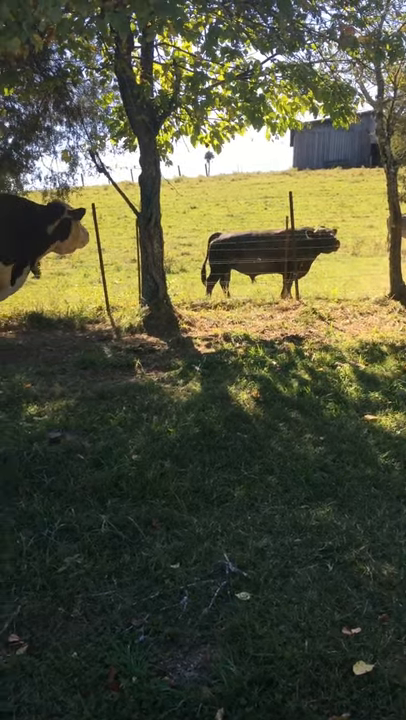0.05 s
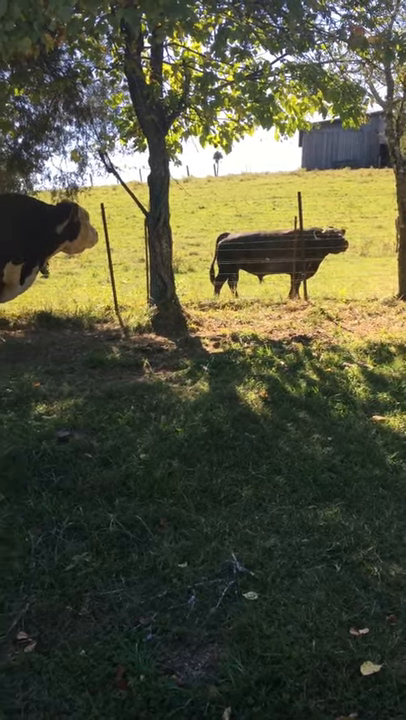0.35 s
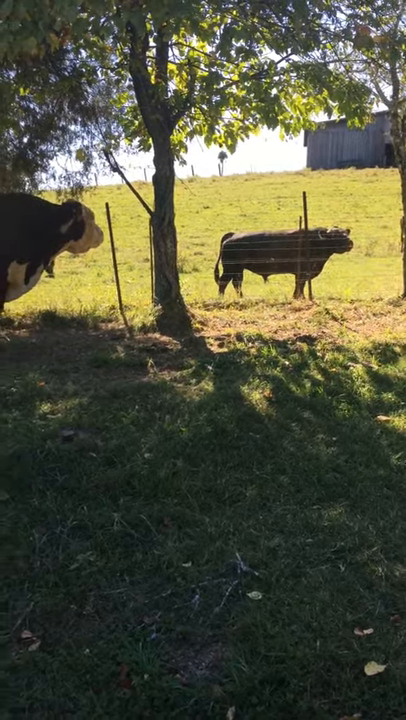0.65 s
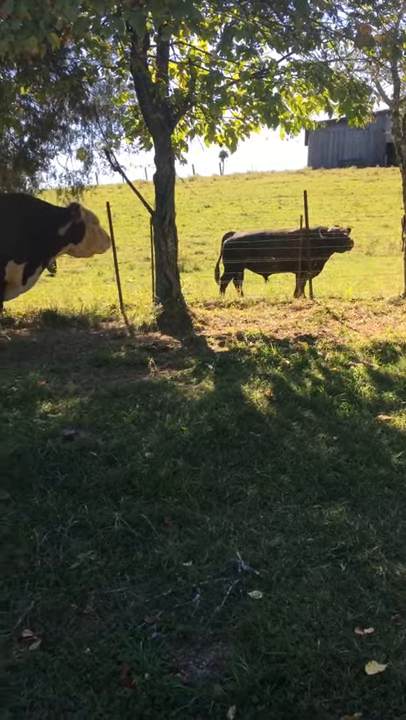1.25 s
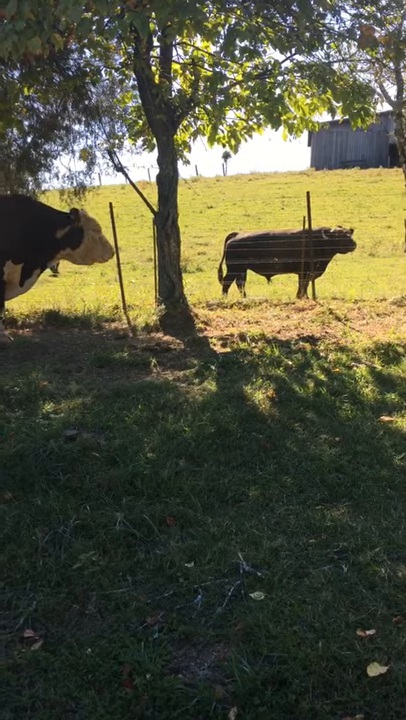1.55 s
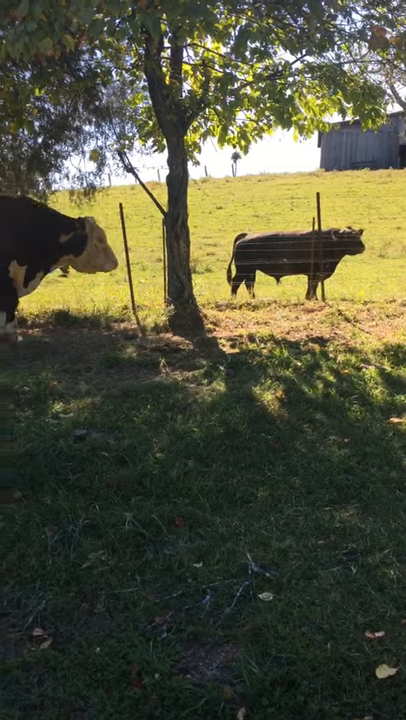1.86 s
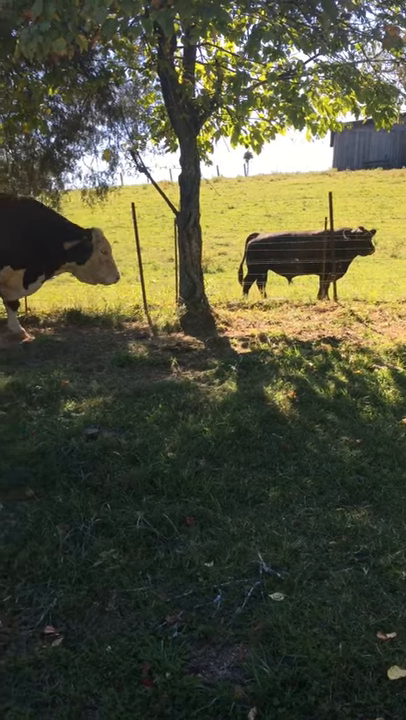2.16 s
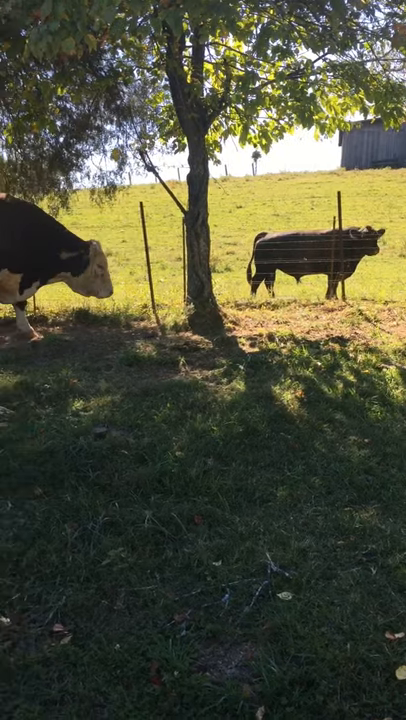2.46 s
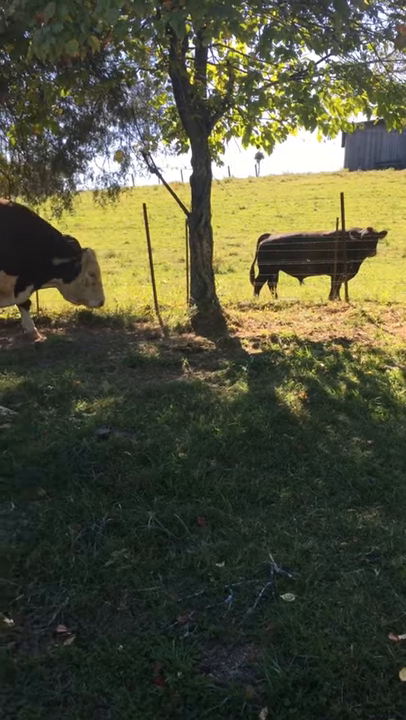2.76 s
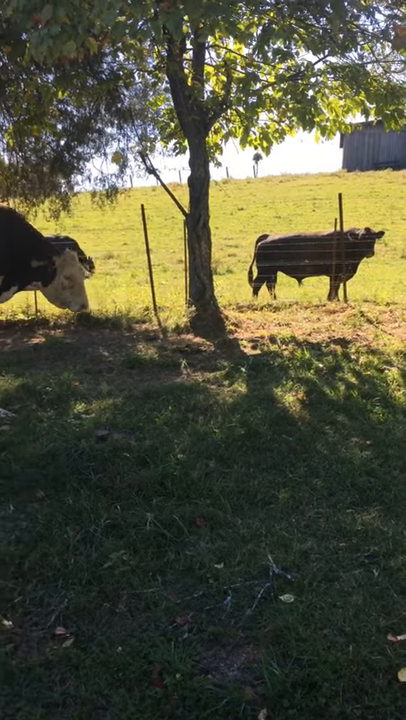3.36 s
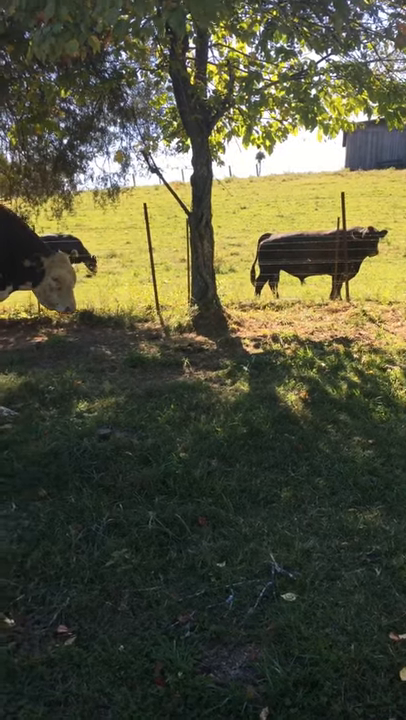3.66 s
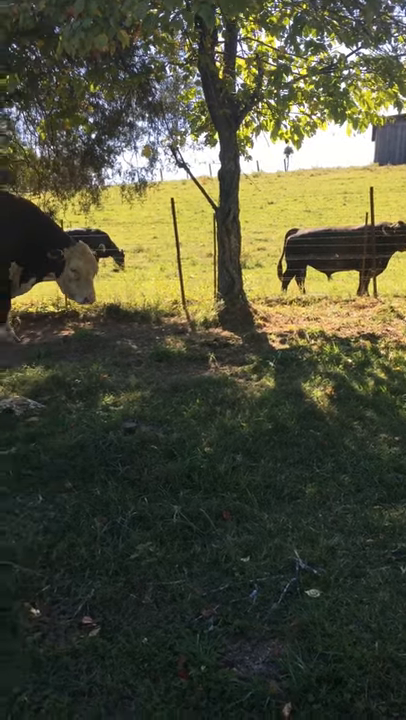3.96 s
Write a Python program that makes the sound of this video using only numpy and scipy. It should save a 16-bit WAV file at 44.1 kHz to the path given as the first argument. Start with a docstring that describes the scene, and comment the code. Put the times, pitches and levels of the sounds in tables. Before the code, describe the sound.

One low bull bellow in a quiet pasture, with soft metal clanks and faint crickets.

```python
"""A bull bellows across a quiet pasture

The bull holds one low, nearly closed-mouth bellow that sags and ends in a puff. A weaker, slightly
higher tone beats against it at first. Crickets trill with their wings, something of steel (probably
the wire fence) clanks five times, and soft bumps and rustles sound close to the microphone."""
import sys
import numpy as np
from scipy import signal
from scipy.fft import rfft, irfft, next_fast_len
from scipy.io import wavfile
from scipy.ndimage import map_coordinates

SR = 44100
rng = np.random.default_rng(int(sys.argv[2]) if len(sys.argv) > 2 else 0)


def dump(signal):
    """Clip the signal to [-1, 1] and save it as 16-bit WAV at the path in sys.argv[1]."""
    limited = np.clip(np.atleast_2d(signal).T, -1, 1)
    pcm = np.round(limited * 32767).astype(np.int16)
    wavfile.write(sys.argv[1], SR, pcm)


N = 176400
T = np.arange(N) / SR

# the wash of open air: frequency_hz, level_db
AIR_COLOUR = [(25, -14.5), (120, 2.5), (240, -8.5), (430, -14), (1000, -15.5), (2000, -18.5), (2700, -19.5),
              (4900, -22.5), (6700, -18), (8100, -23), (9500, -21.5), (10600, -31), (15500, -26)]
# how loud that wash is: time_s, level_db
AIR_LEVEL = [(0, -67), (1.4, -68), (2.0, -67), (2.5, -62.5), (2.8, -65.5), (3.3, -65), (4, -65)]
# air stirring at the microphone: frequency_hz, level_db
RUMBLE_COLOUR = [(20, -22), (55, 0), (130, -2), (190, -6), (260, -19), (600, -43)]
# soft bumps: time_s, peak_db, pitch_hz, half_length_s
BUMPS = [(1.547, -53.5, 60.5, 0.016), (2.562, -48.5, 170, 0.016), (3.022, -42.5, 51, 0.015),
         (3.082, -44, 59, 0.011), (3.128, -51.5, 150, 0.0071), (3.182, -44.5, 53, 0.016),
         (3.3, -47.5, 68, 0.019), (3.355, -46.5, 54.5, .014), (3.367, -47, 320, 0.0038),
         (3.378, -36.5, 156.6, 0.0092), (3.388, -45, 70.4, 0.025), (3.488, -49, 63, 0.01),
         (3.562, -53, 68, 0.036), (3.626, -48, 58, 0.017), (3.81, -49.5, 52, 0.029),
         (3.892, -54, 55, 0.023)]
# rustles in the grass: time_s, level_db, half_length_s
RUSTLES = [(2.447, -59, 0.01), (2.624, -60, 0.0046), (2.633, -61.5, 0.029), (3.631, -66, 0.006)]
# the hiss of a rustle: frequency_hz, level_db
GRASS_COLOUR = [(200, -30), (1000, 4), (2000, -4), (3800, -1), (6000, -2.5), (10000, -11.5), (15000, -17)]
# dull scuffs: time_s, level_db, half_length_s
SCUFFS = [(2.63, -57, 0.025), (2.659, -45, 0.0056), (3.374, -55.5, 0.01), (3.79, -80.5, 0.025)]
# the noise of a scuff: frequency_hz, level_db
SCUFF_COLOUR = [(60, -4.5), (200, 2.5), (400, -21), (650, 6), (800, -10), (1000, 4.5), (1250, -27),
                (1550, -4.5), (2100, -47), (8000, -42)]
# cricket trills: start_s, end_s, level_db, pitch_hz, bend_per_stroke_hz
TRILLS = [(-.05, 0.451, -64, 7280, -450), (0.304, 0.471, -56.5, 7365, -1200),
          (0.713, 0.807, -66, 7340, -450), (1.09, 1.397, -64, 7190, -450), (1.255, 1.504, -58, 7350, -1200),
          (1.6, 1.855, -59.5, 7350, -400), (1.619, 2.114, -56.5, 7326, -1200),
          (1.768, 2.143, -63.5, 7680, -350), (2.291, 2.572, -61, 7170, -350),
          (2.375, 2.675, -55, 7304, -900), (2.821, 3.024, -60.5, 7640, -350),
          (3.096, 3.32, -62, 7270, -350), (3.27, 3.33, -58, 7460, 1402), (3.533, 3.667, -60, 7420, 1494.5),
          (3.595, 3.997, -66.5, 7200, -350), (3.747, 3.91, -61, 7330, -350),
          (3.936, 4.02, -57.5, 7270, 1396)]
# steel clanks: time_s, level_db, relative_scrape_db
CLANKS = [(.641, -45.5, -18), (1.523, -50.5, -15), (2.161, -45.5, -28), (3.106, -49, -6),
          (3.248, -48.5, -7)]
# the notes the steel rings with: pitch_hz, level_db, fade_s
STEEL_NOTES = [(845, -20, .5), (905, -18, .3), (980, -11, .26), (1098, -15, .85), (1177, -15, .3),
               (1680, -18, .5), (2089, -11, .31), (2359, -13, .44), (2540, -11, .3), (2563, -11, .3),
               (2702, -11, .32), (2808, -15, .28), (2880, -18, .34), (3052, -15, .27), (3344, -11, .26),
               (3456, -17, .33), (3655, -15, .39), (3818, -15, .25), (3889, -14, .3), (4310, -16, .18),
               (6638, -15, .18), (9100, -19, .14)]
# the rattle in a clank: frequency_hz, level_db
RATTLE_COLOUR = [(300, -33.5), (750, -16.5), (980, -0.5), (1400, -8), (2100, -1), (2650, 1.5), (3050, -5),
                 (3850, 0), (4100, -11.5), (4350, -2.5), (4900, -11.5), (6600, -12), (7500, -18.5),
                 (15000, -26)]
# the crack of a clank: frequency_hz, level_db
CRACK_COLOUR = [(500, -31.5), (2500, -1), (4300, -2.5), (7000, -3), (10000, -3), (11000, -10), (13000, -8),
                (16000, -9)]
# the weaker tone: time_s, pitch_hz, level_db
SECOND_TONE = [(0, 103.2, -44.5), (.25, 103.4, -40.5), (.5, 100.8, -41.5), (.72, 98.3, -40),
               (.82, 98.1, -49), (.95, 96, -63.5), (1.05, 96, -120)]
# its harmonics (whole multiples of its pitch): multiple, level_db
SECOND_HARMONICS = [(1, -8), (2, 0), (3, -20), (4, -13), (5, -35.5), (7, -29)]
# the tune of the bellow: time_s, pitch_hz
BELLOW_PITCH = [(0, 83.35), (.08, 84.72), (.17, 83.56), (.26, 85.9), (.34, 86.12), (.41, 85.6), (.48, 86.8),
                (.53, 86.1), (.61, 87.38), (.71, 87.06), (.765, 83.6), (.835, 87.4), (.97, 85.7),
                (1.04, 84.5), (1.15, 85.5), (1.27, 81.12), (1.32, 75.4), (1.42, 64.8)]
# how hard the bull pushes: time_s, second_harmonic_db, other_harmonics_db
BELLOW_EFFORT = [(0, -25.5, -26), (.3, -24.5, -26), (.62, -25, -25.5), (.9, -24.5, -27.5),
                 (1.262, -25, -29.5), (1.288, -29.5, -29), (1.318, -51.5, -33.5), (1.342, -41.5, -36),
                 (1.38, -51.5, -38.5), (1.43, -81, -60), (1.5, -100, -100)]
# how throat and mouth shape the harmonics: frequency_hz, early_db, late_db
MOUTH_COLOUR = [(87, -18, -15.5), (267, -26.5, -26), (354, -43, -27.5), (410, -36, -33),
                (527, -48.5, -66.5), (600, -48, -56.5), (697, -33, -37.5), (735, -49.5, -37.5),
                (880, -51, -46.5), (954, -28.5, -25), (1010, -33.5, -27), (1120, -45, -45),
                (1243, -38.5, -48), (1295, -60, -60), (1420, -76, -77), (1550, -49.5, -56),
                (1900, -61.5, -62), (1940, -50, -66.5), (2120, -66, -70.5)]
# hoarse air in the throat: frequency_hz, level_db
RASP_COLOUR = [(60, -12), (170, -2), (300, -11), (520, -22), (720, -6), (830, -14), (990, 1), (1220, -9),
               (1400, -25), (1620, -16), (1930, -16), (2300, -31), (2700, -38), (3200, -28), (4000, -48),
               (9000, -70)]
# the last puff of breath: frequency_hz, level_db
PUFF_COLOUR = [(60, -29.5), (170, 12), (350, -14), (600, -3.5), (880, 6.5), (1100, -8), (1500, -18),
               (4000, -42.5)]


def amp(db):
    """Turn decibels into a number to multiply by."""
    return 10 ** (np.asarray(db) / 20)


def unit(x):
    """Scale a sound to an average strength (rms) of 1."""
    return x / np.sqrt(np.mean(x ** 2) + 1e-20)


def curves(rows):
    """Draw a line through time for each table column after the first."""
    times, *columns = np.transpose(rows)
    return [np.interp(T, times, column) for column in columns]


def wobble(per_s):
    """A smooth curve through per_s random values a second."""
    return map_coordinates(rng.standard_normal(2048), [T * per_s + 2], mode="wrap")


def filtered(x, gain_at):
    """Turn each frequency up or down by gain_at(hz)."""
    size = next_fast_len(N + 8192)
    return irfft(rfft(x, size) * gain_at(np.fft.rfftfreq(size, 1 / SR)), size)[:N]


def noise(colour):
    """Noise of strength 1; the colour table sets its balance of low and high."""
    points_hz, db = np.transpose(colour)
    white = rng.standard_normal(N)
    return unit(filtered(white, lambda hz: amp(np.interp(np.log(hz + 1), np.log(points_hz), db))))


def turning(hz):
    """The phase of a vibration: the angle it has turned through so far."""
    return 2 * np.pi * np.cumsum(hz) / SR


def tone(phase):
    """A pure tone of strength 1 that starts anywhere in its cycle."""
    return np.sqrt(2) * np.sin(phase + rng.uniform(0, 2 * np.pi))


def swell(time_s, half_length_s):
    """A bell-shaped rise and fall around time_s."""
    return np.exp(-np.minimum(((T - time_s) / half_length_s) ** 2, 60))


def struck(t, fade_s, rise_s=0.0026):
    """A quick rise, then a fade that loses 60 dB every fade_s."""
    t = np.maximum(t, 0)
    return (1 - np.exp(-t / rise_s)) * np.exp(-np.minimum(np.log(1000) * t / fade_s, 40))


def air():
    """The quiet wash of the open pasture over an uneven low rumble."""
    db, = curves(AIR_LEVEL)
    wash = amp(db + 1.2 * wobble(8)) * noise(AIR_COLOUR)
    rumble = amp(-71 + 2 * wobble(9)) * noise(RUMBLE_COLOUR)
    return wash + rumble


def field_echo(x, level_db=-18.5, delay_s=.02):
    """Trees and a shed send back a faint, blurred echo."""
    tail = rng.standard_normal(SR) * struck(T[:SR] - delay_s, fade_s=.5)
    return amp(level_db) * signal.fftconvolve(x, tail / np.linalg.norm(tail))[:N]


def bumps_and_rustles():
    """Close by: low bumps of a few cycles, rustling grass and dull scuffs."""
    bumps = sum(amp(db) * swell(s, half_s) * np.cos(2 * np.pi * hz * (T - s))
                for s, db, hz, half_s in BUMPS)
    grass = unit(noise(GRASS_COLOUR) * amp(2.4 * wobble(360)))
    rustles = grass * sum(amp(db) * swell(s, half_s) for s, db, half_s in RUSTLES)
    scuffs = noise(SCUFF_COLOUR) * sum(amp(db) * swell(s, half_s) for s, db, half_s in SCUFFS)
    return bumps + rustles + scuffs


def crickets(strokes_per_s=68, sounding_share=.92, rise_s=.04, fall_s=.019):
    """Each wing stroke is a short whistle that bends away from its starting pitch."""
    out = np.zeros(N)
    for start, end, db, hz, bend_hz in TRILLS:
        on = (T > start) & (T < end)
        t = T[on]
        strokes = (t - start) * strokes_per_s + .05 * wobble(12)[on]
        progress = np.minimum(strokes % 1 / sounding_share, 1)  # 0 to 1, then a short rest
        phase = turning(hz + bend_hz * progress ** 4 + 50 * wobble(300)[on])
        fade = np.minimum((t - start) / rise_s, 1) * np.minimum((end - t) / fall_s, 1)
        level = amp(db + 1.6 * wobble(40)[on]) * fade
        pulse = np.abs(np.sin(np.pi * progress ** .94))
        whistle = tone(phase) + amp(-21) * tone(2 * phase)
        out[on] += level * pulse * whistle
    return out


def steel_clanks(scatter_db=3, scrape_lead_s=.009):
    """A short scrape, then a bright crack and a brief rattle that leave the steel ringing."""
    out = np.zeros(N)
    rattle_noise, crack_noise = noise(RATTLE_COLOUR), noise(CRACK_COLOUR)
    for start, db, scrape_db in CLANKS:
        on = (T > start) & (T < start + 1)
        t = T[on] - start
        ring = np.zeros(len(t))
        for hz, note_db, fade_s in STEEL_NOTES:
            level = amp(note_db + rng.normal(0, scatter_db))
            ring += level * struck(t, fade_s) * tone(2 * np.pi * hz * t)
        crack = amp(-4) * struck(t, fade_s=.095) * crack_noise[on]
        rattle = amp(-1.5) * struck(t, fade_s=.2) * rattle_noise[on]
        out[on] += amp(db) * (amp(-2.5) * ring + crack + rattle)
        scrape = swell(start - scrape_lead_s, half_length_s=.005) * crack_noise
        out += amp(db + scrape_db) * scrape
    return out


def voice_phase(hz, waver=.0034):
    """The phase of a voice whose pitch is never quite steady."""
    return turning(hz * (1 + waver * wobble(45)))


def second_tone():
    """A weaker, higher vibration that sinks and fades a little past halfway through the call."""
    hz, db = curves(SECOND_TONE)
    phase = voice_phase(hz)
    return amp(db) * sum(amp(level_db) * tone(k * phase) for k, level_db in SECOND_HARMONICS)


def mouth_harmonics(hz, phase, shift_s=(.55, .99), close_s=(1.15, 1.4), flicker_db_per_khz=3.57):
    """The mouth favours some harmonics over others, and changes shape during the call."""
    mouth_hz, early_db, late_db = np.transpose(MOUTH_COLOUR)
    shift = np.interp(T, shift_s, [0, 1])  # from the early shape to the late one
    sink = np.interp(T, close_s, [1, .9])  # the favoured frequencies drop at the end
    out = np.zeros(N)
    for k in range(1, 25):
        if k == 2:  # the boom has a level of its own in bellow()
            continue
        early = np.interp(k * hz / sink, mouth_hz, early_db)
        late = np.interp(k * hz / sink, mouth_hz, late_db)
        flicker_db = flicker_db_per_khz * k * hz / 1000 * wobble(45)
        out += amp((1 - shift) * early + shift * late + flicker_db) * tone(k * phase)
    return out


def bellow():
    """Slow vocal folds make a hoarse voice with a booming second harmonic; a puff ends it."""
    hz, = curves(BELLOW_PITCH)
    boom_db, voice_db = curves(BELLOW_EFFORT)
    phase = voice_phase(hz)
    harmonics = mouth_harmonics(hz, phase)
    rasp = amp(-31.3) * unit(noise(RASP_COLOUR) * (1 + .7 * np.cos(phase)))  # air pulses once a cycle
    boom = amp(boom_db + .95 * wobble(25)) * tone(2 * phase)
    puff = amp(-50.5) * swell(time_s=1.443, half_length_s=.025) * noise(PUFF_COLOUR)
    return boom + amp(voice_db) * (harmonics + rasp) + puff


def scene():
    """Bull, steel and crickets echo in the field; the close sounds and the air do not."""
    far = bellow() + second_tone() + steel_clanks() + crickets()
    return (far + field_echo(far) + bumps_and_rustles() + air())[None]


def record(dry, top_hz=15750):
    """Cut away everything higher than top_hz."""
    return np.array([filtered(x, lambda hz: hz < top_hz) for x in dry])


dry = scene()
out = record(dry)
dump(out)
```